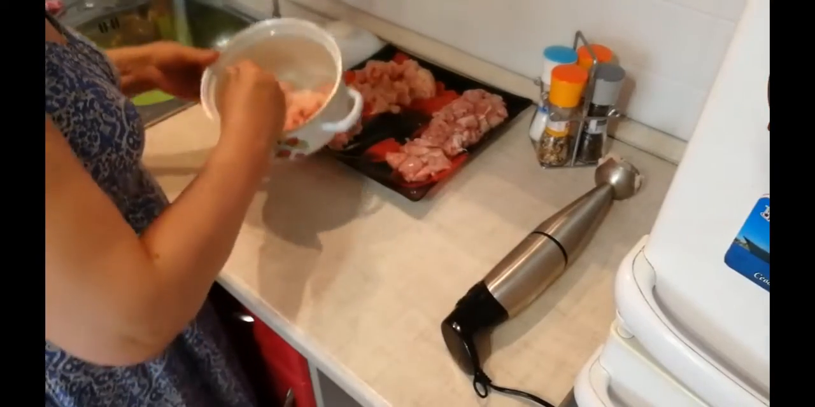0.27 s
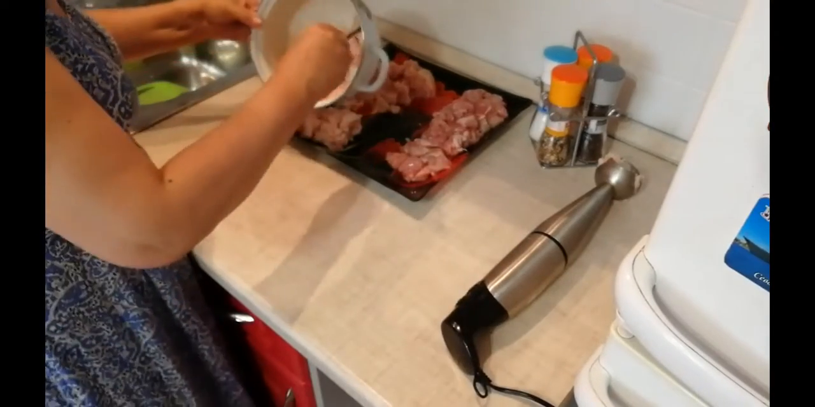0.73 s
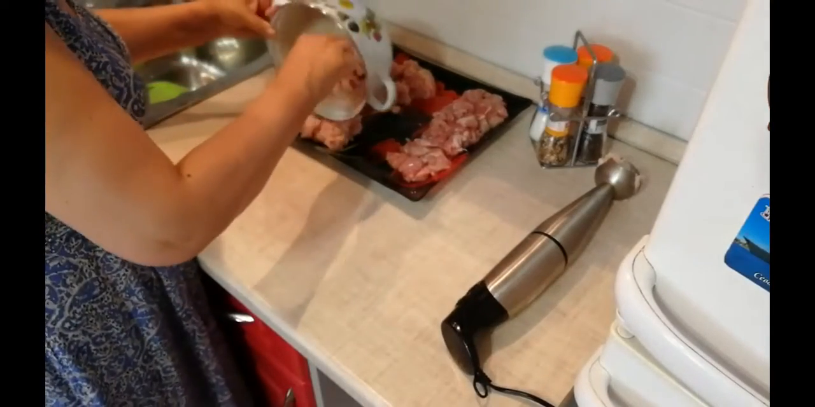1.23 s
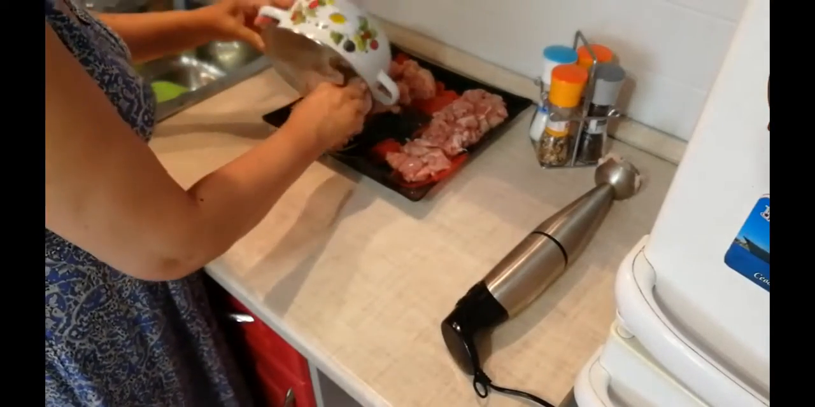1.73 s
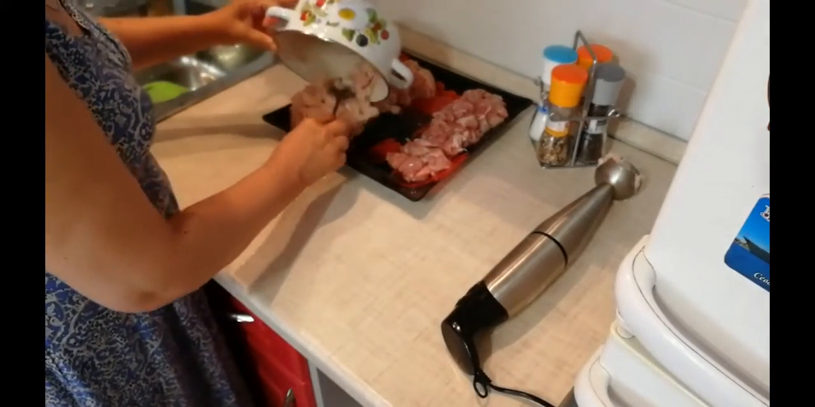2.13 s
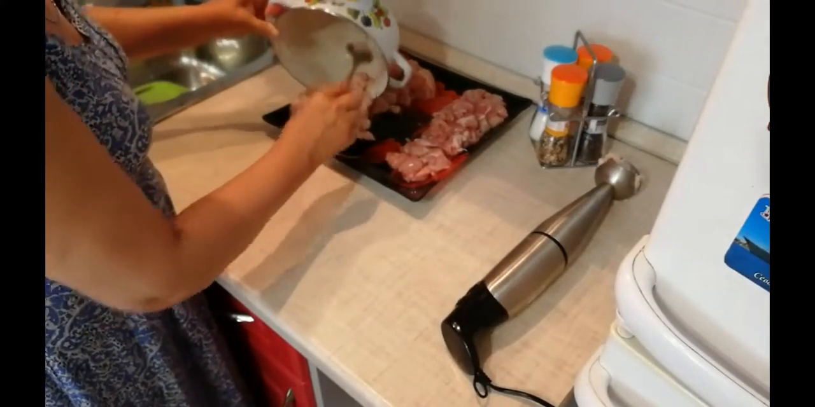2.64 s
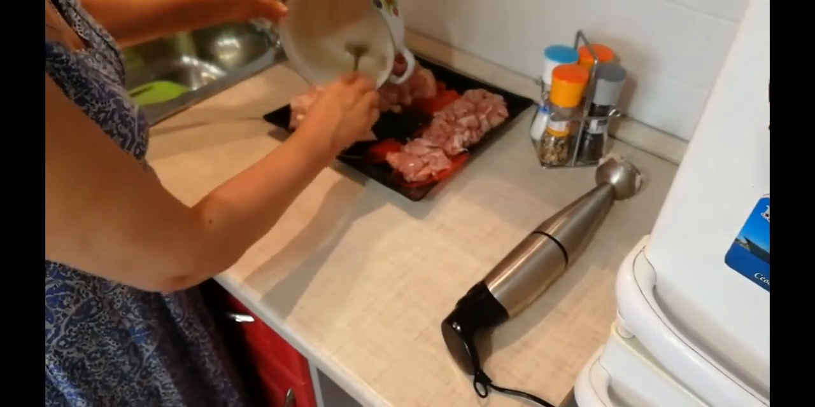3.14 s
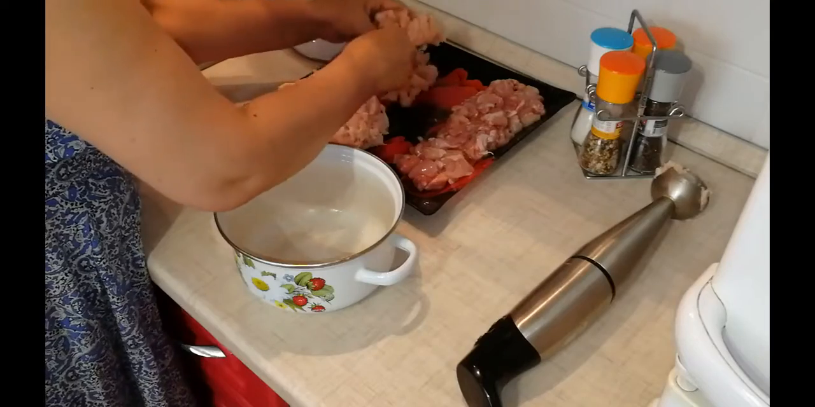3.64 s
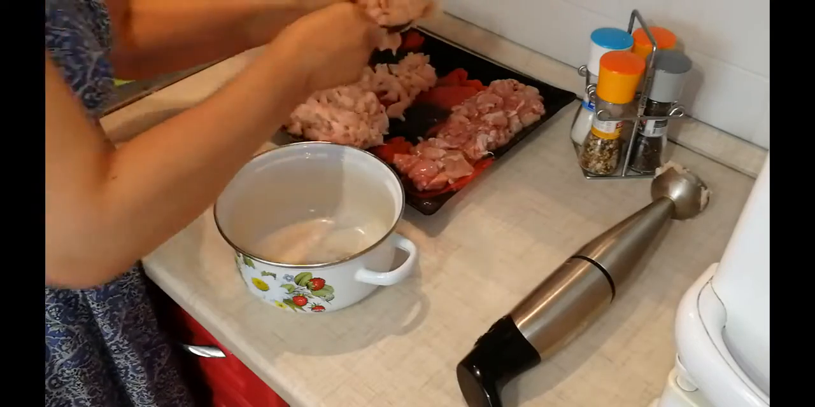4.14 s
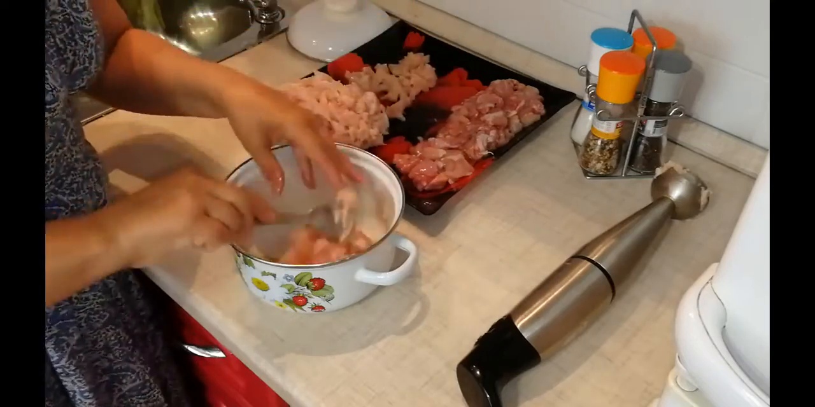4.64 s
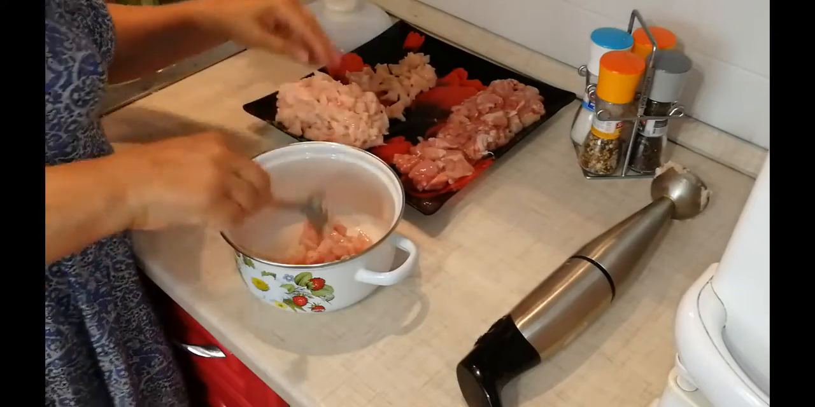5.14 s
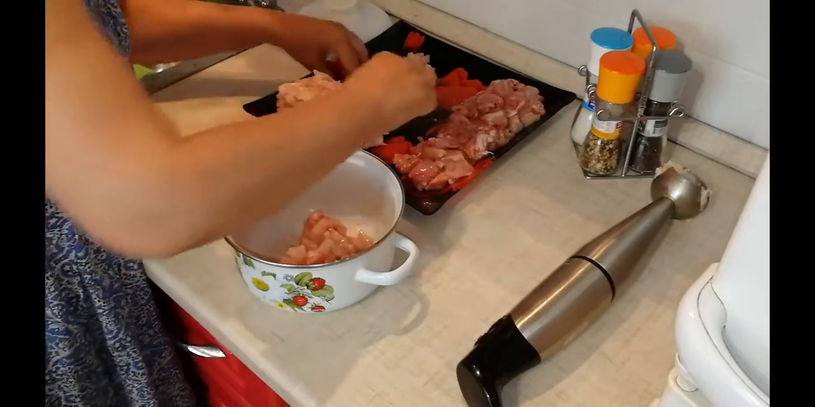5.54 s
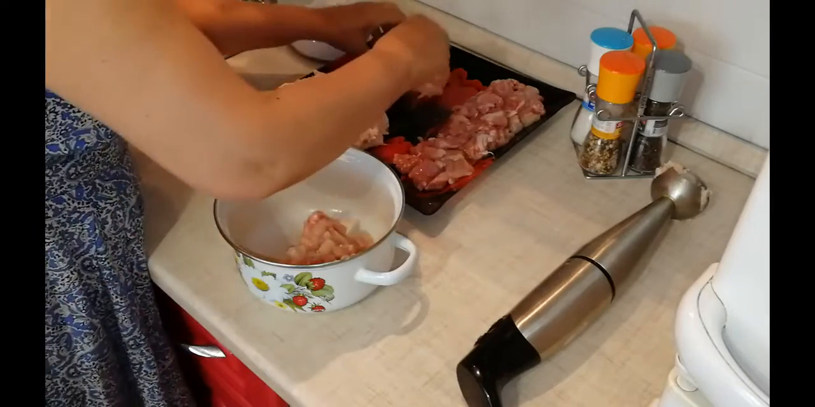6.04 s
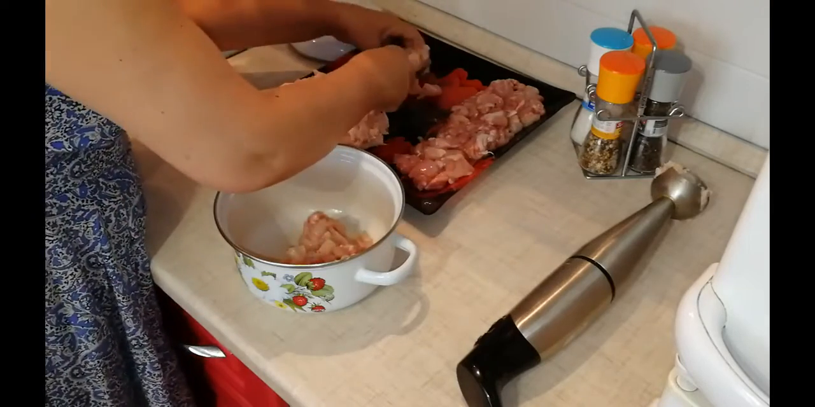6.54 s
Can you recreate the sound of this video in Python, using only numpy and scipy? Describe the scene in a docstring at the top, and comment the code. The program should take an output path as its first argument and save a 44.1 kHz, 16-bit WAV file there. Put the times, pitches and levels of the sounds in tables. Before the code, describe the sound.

Four damped pot knocks with bright metallic scrapes, sticky ticks, a short dropout, then soft wet rustling and dry spoon taps on a tray.

```python
"""A faint hum and hiss lie under a small kitchen. A spoon knocks a hand-held enamel pot, whose damped modes ring,
and slips along it in scraping strokes; soft low bumps lie under some of the knocks and taps. Ticks and wet rustles
come as resonated puffs and dense clicks. The sound drops out once, after the last scrape; later the spoon taps a
tray in dry bursts through broad bands, among wet rustles and dull rubs, and slides on the tray near 5.94 s."""
import sys
import numpy as np
from scipy import signal
from scipy.fft import rfft, irfft, next_fast_len
from scipy.io import wavfile
from scipy.ndimage import uniform_filter1d

SR = 44100
rng = np.random.default_rng(int(sys.argv[2]) if len(sys.argv) > 2 else 0)


def wav_record(signal):
    """Record a signal, one row per channel, as 16-bit PCM in the file named by sys.argv[1]."""
    frames = np.transpose(np.atleast_2d(signal))
    bounded = np.clip(frames, -1, 1)
    # unit amplitude maps onto the largest positive 16-bit level
    quanta = np.round(bounded * 32767).astype(np.int16)
    wavfile.write(sys.argv[1], SR, quanta)


def voltage_ratio(level):
    """Linear amplitude factor for a level in decibels (scalar or array-like)."""
    return 10 ** (np.asarray(level, float) / 20)


N = 299439

# nominal modes of the hand-damped pot: f/Hz, level/dB, t60/s; pitch and ring are scaled in use
POT_MODES = [(776, -2.5, 0.04), (1469.4, 0.5, 0.046), (2130, -2, 0.038), (2913, -5, 0.035),
             (3350, 5.5, 0.031), (4260, -11, .04), (4780, -10, 0.15), (5730, -8, 0.053), (6830, -1, 0.018),
             (8034, -5.5, 0.026), (8500, 1, 0.022), (10280, 0, 0.055)]
# left-right likeness of diffuse sound: f/Hz, correlation (-1 to 1)
LIKENESS = [(30, 0.9), (70, 0.99), (150, 0.9), (240, -0.2), (950, -0.2), (3770, -0.14), (15000, -0.27)]


def read(points, hz):
    """Reads a table on a log-frequency axis."""
    f, value = np.transpose(points)
    return np.interp(np.log(hz + 1), np.log(f + 1), value)


def evened(x):
    """Scales to rms 1."""
    return x / np.sqrt(np.mean(x ** 2) + 1e-20)


def add(mix, s, sound):
    """Mixes a sound in at s seconds."""
    part = mix[round(s * SR):][:len(sound)]
    part += sound[:len(part)]


def coloured(x, points):
    """Filters x by a spectrum in dB."""
    hz = np.fft.rfftfreq(x.shape[-1], 1 / SR)
    return irfft(rfft(x) * voltage_ratio(read(points, hz)), x.shape[-1])


def flattened(x):
    """Irons the chance bumps out of a short burst's spectrum; the burst stays in the first half."""
    z = rfft(x)
    power = uniform_filter1d(abs(z) ** 2, size=len(x) // 250)
    flat = irfft(z / np.sqrt(power + 1e-12), len(x))
    return flat * np.linalg.norm(x) * (np.arange(len(x)) < len(x) // 2)


def resonate(x, hz, width):
    """One resonance: shifts the curve hz down to zero, smooths, and shifts back."""
    turn = np.exp(2j * np.pi * np.cumsum(hz * np.ones(len(x))) / SR)
    r = np.exp(-np.pi * width / SR)
    return 2 * (turn * signal.lfilter([1 - r], [1, -r], x / turn)).real


def grains(size, spread_db, per_s, clump_db=1.0):
    """Stick-slip: dense tiny clicks of uneven size that come in clumps."""
    clumps = evened(uniform_filter1d(rng.standard_normal(size), 600))
    sizes = voltage_ratio(spread_db * np.minimum(rng.exponential(1, size), 4) + clump_db * clumps)
    return sizes * rng.standard_normal(size) * (rng.random(size) < per_s / SR)


def burst(size, rise_s, t60):
    """A quick rise and an exponential fall."""
    t = np.arange(size) / SR
    return (1 - np.exp(-t / rise_s)) * voltage_ratio(-60 * t / t60)


def stroke(rows):
    """Start time, columns at every sample and an envelope with 10 ms fades for one stroke."""
    s, *columns = np.transpose(rows)
    t = np.arange(s[0], s[-1], 1 / SR)
    fade = np.clip(np.minimum(t - s[0], s[-1] - t) / .01, 0, 1)
    return s[0], [np.interp(t, s, c) for c in columns], fade


def floor():
    """Hiss and a slowly changing rumble, alike in both channels only in the bass, with wavering hums."""
    # background noise colour: f/Hz, relative level/dB
    noise_colour = [(12, -36), (20, -4.5), (44, 2.5), (70, -14.5), (104, -4), (168, -12), (241, -10.5),
                    (624, -19.5), (1370, -16), (2320, -22), (5230, -20.5), (9670, -22.5), (12800, -24.5),
                    (14700, -24.5), (16000, -44)]
    # narrow noise bands heard as hum: f/Hz, width of each of two resonances/Hz, level over the rumble/dB
    hum_bands = [(99, 18, -7.5), (143, 15, -9.5), (186.8, 8, -8), (239.6, 100, -7)]
    # course of the rumble, which the hums follow: t/s, level/dB
    rumble_course = [(0, -62.5), (.6, -66), (1.2, -65.5), (2.7, -63.5), (3.001, -66), (3.3, -64),
                     (3.6, -57.5), (4.101, -61.5), (4.6, -61), (5.2, -62.5), (5.998, -62), (6.79, -60.5)]
    hiss_db, crossover_hz = -60, 330
    size = next_fast_len(N)
    hz = np.fft.rfftfreq(size, 1 / SR)
    left, other = rfft(rng.standard_normal((2, size)))
    same = np.clip(read(LIKENESS, hz), -1, 1)
    right = same * left + np.sqrt(1 - same ** 2) * other
    pair = np.array([left, right]) * voltage_ratio(read(noise_colour, hz))
    bass = 1 / (1 + (hz / crossover_hz) ** 4)
    rumble = irfft(pair * bass, size)[:, :N]
    hiss = irfft(pair * (1 - bass), size)[:, :N]
    noise = rng.standard_normal(N)
    hum = sum(voltage_ratio(db) * evened(resonate(resonate(noise, f, w), f, w)) for f, w, db in hum_bands)
    rumble_db = np.interp(np.arange(N) / SR, *np.transpose(rumble_course))
    return voltage_ratio(hiss_db) * evened(hiss) + voltage_ratio(rumble_db) * (evened(rumble) + hum)


def knock(db, low_db, second_db, third_db, upper_db, second_hz, ring):
    """A noisy contact of a few ms, and the pot modes dying under the hand; all modes shift together."""
    # colour of the contact itself: f/Hz, relative level/dB
    crack_colour = [(880, -34.5), (1500, -0.5), (1830, -17), (2140, -11), (2440, -9), (4160, -9),
                    (9950, -6.5), (16000, -20.5)]
    t = np.arange(16000) / SR
    struck_db = np.array([low_db, second_db, third_db] + [upper_db] * (len(POT_MODES) - 3))
    turns = second_hz / POT_MODES[1][0] * t
    rings = sum(voltage_ratio(mode_db + extra_db) * burst(len(t), 0.001, t60 * ring) * np.sin(2 * np.pi * hz * turns)
                for (hz, mode_db, t60), extra_db in zip(POT_MODES, struck_db))
    contact = rng.standard_normal(len(t)) * burst(len(t), 0.0016, 0.023)
    contact_rms = np.sqrt(np.mean(contact ** 2))
    crack = evened(coloured(flattened(contact), crack_colour)) * contact_rms * (t < t[-1] / 2)
    return voltage_ratio(db) * (rings + voltage_ratio(0.5) * crack)


def kitchen(x):
    """Sparse reflections of random sign, each band dying at its own speed; the bass is shared by both ports."""
    # decay of the room: f/Hz, t60/s
    room_decay = [(250, 0.29), (700, 0.61), (1400, 0.43), (2500, 0.35), (5000, 0.44), (10000, 0.37),
                  (16000, 0.29)]
    taps = np.zeros((2, 30000))
    at = np.arange(160, 29980, 20) + rng.integers(0, 20, (2, 1491))  # one in every 20 samples
    np.put_along_axis(taps, at, rng.choice([-1., 1.], at.shape), 1)
    hz, t, z = signal.stft(taps, SR, nperseg=256)
    same = np.clip(read(LIKENESS, hz) + .25, 0, 1)[:, None]  # more alike than the background
    z[1] = same * z[0] + np.sqrt(1 - same ** 2) * z[1]
    decay = voltage_ratio(-60 * t / read(room_decay, hz)[:, None])
    tail = signal.istft(z * decay, SR, nperseg=256)[1]
    return signal.fftconvolve(x[None], tail / np.linalg.norm(tail[0]), axes=1)[:, :N]


def bump(db, hz):
    """A soft low push: the tick's puff through a narrow resonance, 110 Hz wide at each pass."""
    return tick(db, hz, 110)


def scrape(low_over_db, start_hz, end_hz, rows):
    """Slips of the spoon edge feed the two lowest rings, grit with a wandering peak, and hiss."""
    # bright scrape colour: f/Hz, relative level/dB
    hiss_colour = [(2940, -44.5), (5000, -15), (6800, -5), (8620, -2), (10300, -2), (11100, -9),
                   (14400, -10), (16000, -28)]
    # rough midrange colour: f/Hz, relative level/dB
    grit_colour = [(1060, -41.5), (1800, -15.5), (2010, -9), (2670, -10), (4920, -9.5), (5250, -22),
                   (5500, -24), (7150, -55), (12100, -120)]
    low_top_db = -50  # the low ring grows with the hiss up to this level
    grit_over_db = -2.5  # over the hiss
    peak_hz, wander, wander_s = 2847, 0.12, 0.026  # grit peak, rms log-pitch wander, its smoothing
    s, (hiss_db, second_over_db), fade = stroke(rows)
    second_hz = np.linspace(start_hz, end_hz, len(fade))
    slips = grains(len(fade), 5.5, 4000, clump_db=0.0)
    fine = grains(len(fade), 3.4, 12000, clump_db=1.0)
    drift = evened(uniform_filter1d(rng.standard_normal(len(fade)), round(wander_s * SR)))
    grit_hz = peak_hz * np.exp(wander * drift)
    low_hz = POT_MODES[0][0]
    low = resonate(resonate(slips, low_hz * 0.9, 140), low_hz, 86)
    second = resonate(resonate(slips, second_hz, 75), second_hz, 190)
    upper = sum(resonate(slips, hz * second_hz / POT_MODES[1][0], 90) for hz, _, _ in POT_MODES[2:7])
    wandering = resonate(resonate(slips, grit_hz, 250), grit_hz, 250)
    grit = evened(coloured(fine, grit_colour)) + 0.26 * evened(upper) + 2.0 * evened(wandering)
    parts = ((hiss_db, coloured(fine, hiss_colour)),
             (np.minimum(hiss_db + low_over_db, low_top_db), low),
             (hiss_db + second_over_db, second),
             (hiss_db + grit_over_db, grit))
    return s, fade * sum(voltage_ratio(db) * evened(part) for db, part in parts)


def tick(db, hz, width=2000):
    """A puff of noise through one broad resonance, passed twice; low ones last longer."""
    width = np.clip(width, 30, hz)  # Hz, never wider than its centre
    puff = rng.standard_normal(4000) * burst(4000, 0.0001, 0.019 + 8 / hz)
    puff = resonate(resonate(flattened(puff), hz, width), hz, width)
    return voltage_ratio(db) * puff / abs(puff).max()


def rustle(start, length, fizz_db, rub_db, rub_hz):
    """Fine wet crackle with a duller rub below it; both swell and fade together."""
    # colour of the wet crackle: f/Hz, relative level/dB
    fizz_colour = [(2650, -42), (4500, -8), (5870, -11), (6810, -8), (9160, 0), (11000, -5), (13900, -9.5),
                   (16000, -20.5)]
    peak_share, edge_db = 0.29, -23  # share of the length at which it peaks; swell level at both ends
    s, (swell_db,), fade = stroke([(start, edge_db), (start + peak_share * length, 0),
                                   (start + length, edge_db)])
    crackle = grains(len(fade), 1.4, 4500)
    rub = resonate(resonate(crackle, rub_hz, 2200), rub_hz, 2200)
    rub = signal.sosfilt(signal.butter(2, 500, "high", fs=SR, output="sos"), rub)
    fizz = evened(coloured(crackle, fizz_colour))
    return s, fade * voltage_ratio(swell_db) * (voltage_ratio(fizz_db) * fizz + voltage_ratio(rub_db) * evened(rub))


def tap(db, *parts_db):
    """No ring: one click and a very short rattle through broad damped bands."""
    # boom, body, clack, snap and air of the tray: f/Hz, nominal width/Hz (widened in use)
    tray_bands = [(700, 1100), (1450, 1200), (3000, 2600), (7500, 5800), (13000, 3600)]
    lengths = (.04, .03, .022, .015, .012)  # t60 of each band's rattle, s
    out = np.zeros(8000)
    for part_db, (hz, width), t60 in zip(parts_db, tray_bands, lengths):
        blow = 0.68 * rng.standard_normal(8000) * burst(8000, 0.00047, t60)
        blow[8] += 1  # the click
        band = flattened(blow)
        for _ in range(3):
            band = resonate(band, hz, width * 1.3)
        out += voltage_ratio(part_db) * band / abs(band).max()
    return voltage_ratio(db) * out


def scene():
    """Blows and rubs reach the two ports with their own phase; three kitchen tails blend in a steady cycle."""
    # spoon on pot: t/s, level/dB, then first, second, third and upper rings/dB relative to it,
    # second ring f/Hz, ring length factor
    knock_events = [(0.218, -14, -13.5, -10.5, -18.5, -5, 1408, 0.99),
                    (0.771, -4.5, -12.5, -7.5, -2.5, -8.5, 1471, 0.66),
                    (1.465, -4.5, 6.5, 2, -23, -13, 1449, .4),
                    (2.853, -5.5, -14.5, -9.5, -15, -11.5, 1495, 1)]
    # spoon on tray: t/s, level/dB, then boom, body, clack, snap, air/dB relative to it
    tap_events = [(4.728, -21, -24, -18.5, -21, 0.5, -12), (4.741, -13, -23, -22, -19.5, 0, -8),
                  (5.832, -1.5, -16, -8.5, 0.5, -5.5, -32), (6.37, -6, -25, -8.5, 0, -3, -20)]
    # small sticky ticks: t/s, level/dB, centre f/Hz
    tick_events = [(0.509, -37, 8500), (1.26, -36.5, 9500), (1.2887, -28.5, 8740), (1.3142, -31.5, 9000),
                   (1.37, -33.5, 8560), (1.6567, -27.5, 8370), (1.6857, -31.5, 3150), (2.0225, -41, 6480),
                   (2.4134, -52, 8480), (2.687, -29.5, 7200), (3.0054, -20.5, 8500), (3.043, -20, 8700),
                   (3.0884, -34.5, 3300), (3.8951, -42.5, 9700), (4.14, -44, 9200), (4.6035, -52.5, 1084),
                   (4.6597, -41, 3660), (4.904, -43.5, 620), (4.947, -43.5, 1830), (4.9614, -44, 2290),
                   (4.9753, -43, 2420), (5.0053, -52, 1160), (5.5235, -49, 1640), (6.0394, -39, 5600),
                   (6.3065, -44.5, 4650), (6.346, -46.5, 900), (6.7585, -36, 4500)]
    # low bumps: t/s, level/dB, centre f/Hz
    bump_events = [(0.22, -38, 352), (0.772, -30.5, 347), (2.855, -40.5, 305), (4.208, -48, 254),
                   (4.757, -55, 236), (5.524, -56, 264), (5.838, -30, 374)]
    # spoon dragged along the pot, one entry a stroke: low ring over the hiss/dB, second ring start and end f/Hz,
    # course (t/s, hiss level/dB, second ring over the hiss/dB)
    scrape_strokes = [ (-11.5, 1430, 1390, [(0.26, -47.5, 9), (0.322, -46.5, 2), (0.362, -44, 1.5),
                      (0.398, -38, -3), (0.43, -55.5, -2.5), (0.53, -58.5, -8), (0.58, -65, -20)]),
                      (-6, 1400, 1320, [(0.99, -61, -12), (1.034, -41.5, -13), (1.074, -37, 4.5),
                      (1.148, -38, -6), (1.182, -63, -9), (1.25, -63.5, -7)]),
                      (-14.5, 1454, 1760, [(1.68, -48.5, -10), (1.77, -62.5, -6), (1.888, -59.5, 6.5),
                      (1.952, -65, -1), (2.0, -52.5, -7.5), (2.096, -62, -10), (2.194, -60.5, -9),
                      (2.25, -72, -3.5)]), (-29.5, 1470, 1526, [(2.93, -36, -13), (2.964, -42.5, -14),
                      (3.002, -37, 1), (3.028, -43, -6), (3.066, -34, 0.5), (3.14, -34.5, 2.5),
                      (3.192, -42, -26), (3.258, -65.5, -1), (3.34, -79.5, -7)]), ]
    # wet rustles and dull rubs, with the spoon sliding on the tray near 5.94 s:
    # start t/s, length/s, fizz level/dB, duller rub level/dB, rub peak f/Hz
    rustle_events = [(1.26, 0.12, -45.5, -59.5, 2560), (1.35, .09, -48, -71.5, 2400),
                     (2.293, 0.12, -62.5, -80, 1914), (2.458, 0.1, -62.5, -87.5, 2300),
                     (2.655, 0.1, -50.5, -58, 3480), (3.541, 0.27, -67.5, -59.5, 894),
                     (3.87, 0.29, -53.5, -71.5, 2233), (4.072, .42, -42.5, -59.5, 2100),
                     (4.555, 0.183, -63, -64.5, 2530), (4.826, .12, -48.5, -65, 2500),
                     (4.916, 0.16, -68, -56, 2010), (5.041, 0.17, -57.5, -69, 2020),
                     (5.416, 0.24, -70, -67.5, 1450), (5.937, 0.091, -52, -53, 2150),
                     (6.285, 0.069, -65, -59.5, 1410), (6.463, 0.085, -49, -47, 3000),
                     (6.56, 0.18, -53.5, -47.5, 3100), (6.72, 0.16, -55.5, -50.5, 2340)]
    # phase of the direct sound between the ports: f/Hz, left lead/rad
    left_lead = [(0, 0), (2600, .6), (4500, 8), (10700, 23.5), (17000, 36)]
    # balance of the microphone pair: f/Hz, left over right/dB
    left_lean = [(60, 4), (99, 5.5), (160, -5), (270, 4.5), (450, 1), (740, 4.5), (1220, 1), (2010, -2),
                 (3330, 2), (5500, 3), (9080, 11.5), (15000, -10.5)]
    size = next_fast_len(N)
    blows, rubs = np.zeros((2, size))
    for mix, play, table in ((blows, knock, knock_events), (blows, tap, tap_events),
                             (rubs, tick, tick_events), (rubs, bump, bump_events)):
        for s, *row in table:
            add(mix, s - .0005, play(*row))  # starts just ahead of the listed time
    # small things radiate no bass
    blows = signal.sosfilt(signal.butter(4, 450, "high", fs=SR, output="sos"), blows)
    for play, table in (scrape, scrape_strokes), (rustle, rustle_events):
        for row in table:
            add(rubs, *play(*row))
    hz = np.fft.rfftfreq(size, 1 / SR)
    sides = np.array([[.5], [-.5]])  # left, right
    phase = np.interp(hz, *np.transpose(left_lead)) * (sides - .5)
    direct = irfft(rfft(blows + rubs) * np.exp(1j * phase), size)
    sent = voltage_ratio(-2.5) * blows + voltage_ratio(-6.0) * rubs
    # three room tails blend into each other over a 2.9 s cycle at constant power
    turn = 2 * np.pi * np.arange(size) / SR / 2.9
    wet = sum(kitchen(sent * np.sqrt(2 / 3) * np.cos(turn + k * np.pi / 3)) for k in range(3))
    balance = voltage_ratio(read(left_lean, hz) * sides)
    return irfft(rfft(direct[:, :N] + wet, size) * balance, size)[:, :N] + floor()


def low_pass(x):
    """Removes everything above the highest recorded frequency."""
    return signal.sosfilt(signal.butter(12, 17010, fs=SR, output="sos"), x)


def record(dry):
    """A gap in the sound, a slight constant offset and the full-scale limit."""
    # the one dropout: start t/s, end t/s
    gap = 3.341, 3.607
    t = np.arange(N) / SR
    on = (t < gap[0]) | (t > gap[1])
    mix = np.clip(dry * on - .0004, -1, 1)
    return low_pass(mix)


dry = scene()
out = record(dry)
wav_record(out)
```